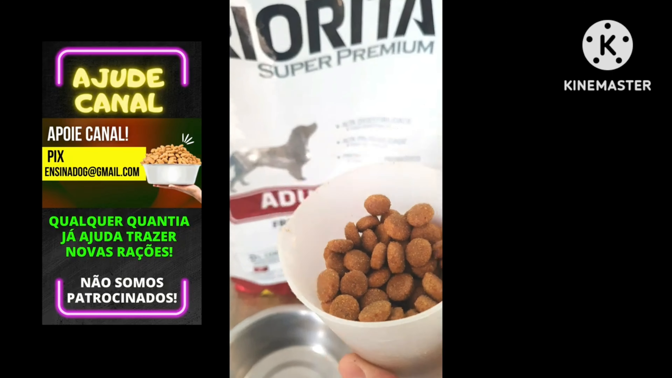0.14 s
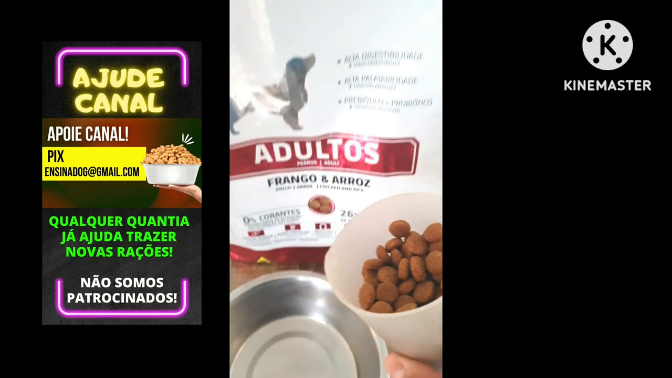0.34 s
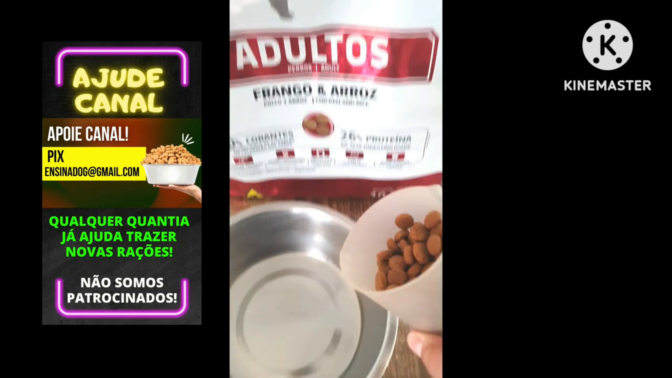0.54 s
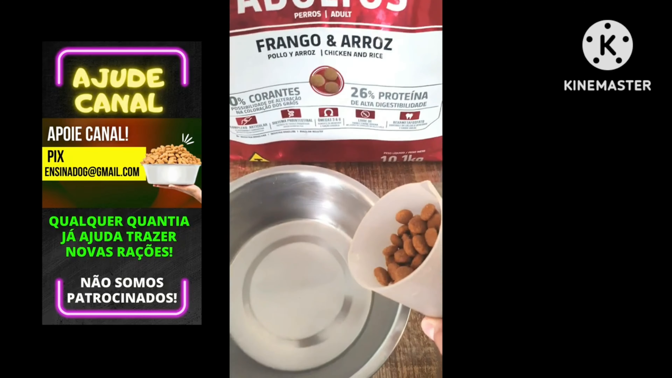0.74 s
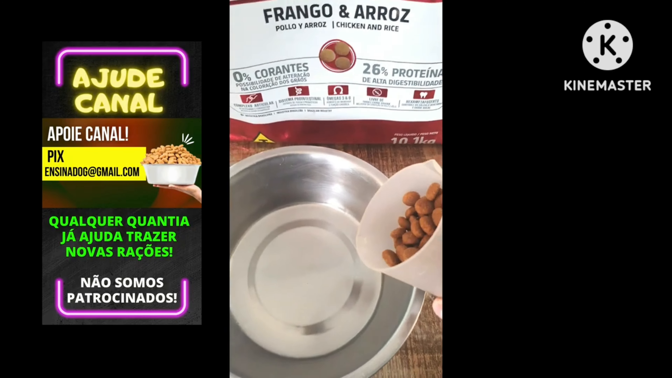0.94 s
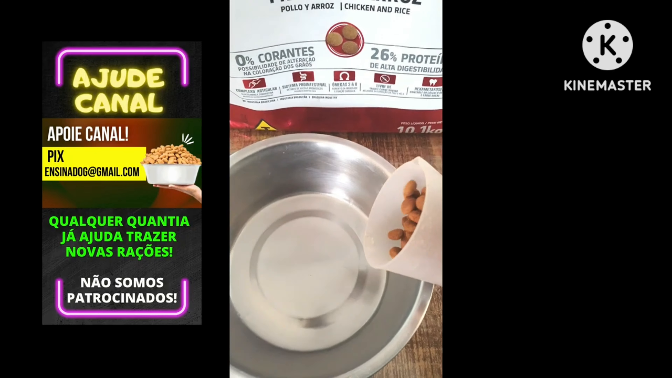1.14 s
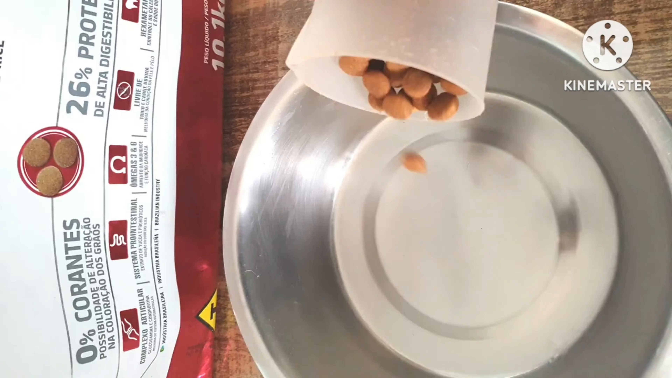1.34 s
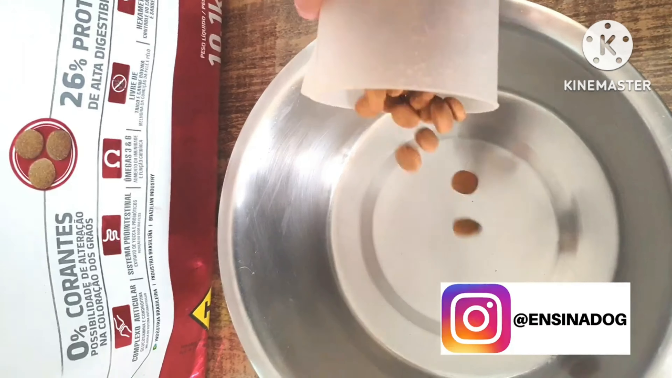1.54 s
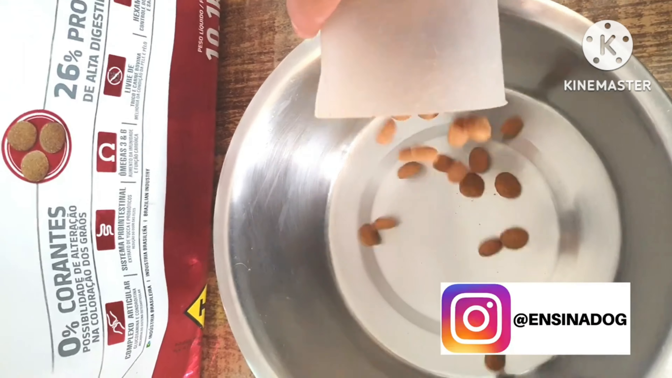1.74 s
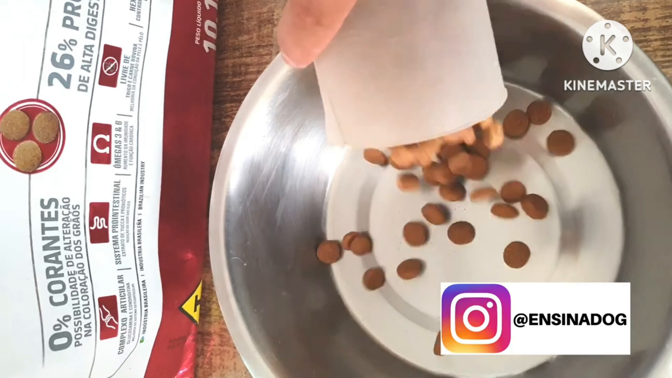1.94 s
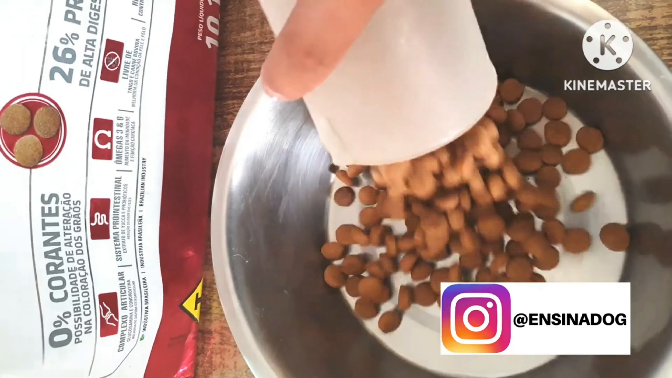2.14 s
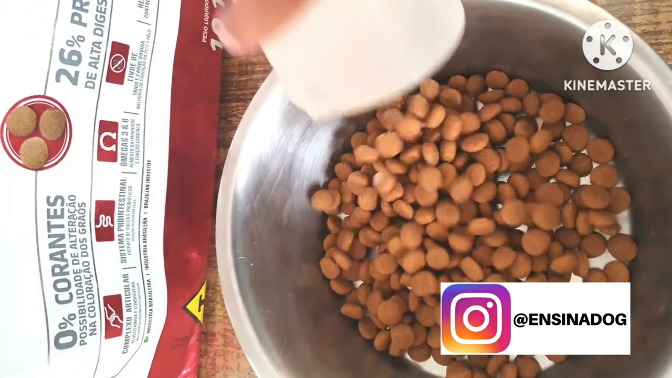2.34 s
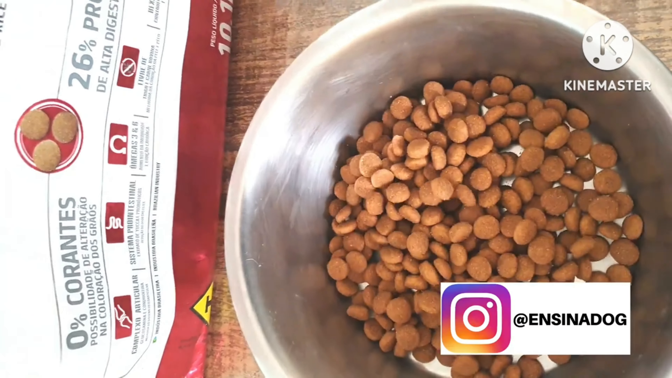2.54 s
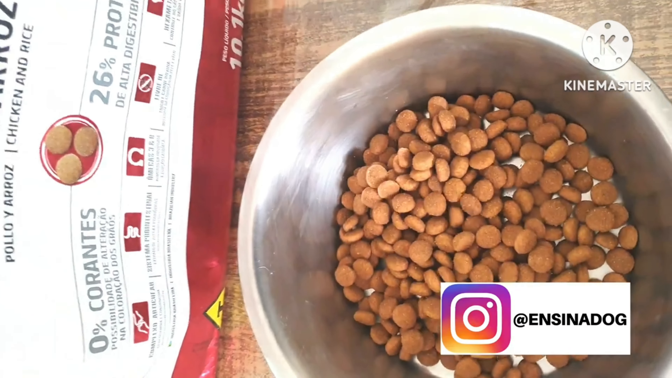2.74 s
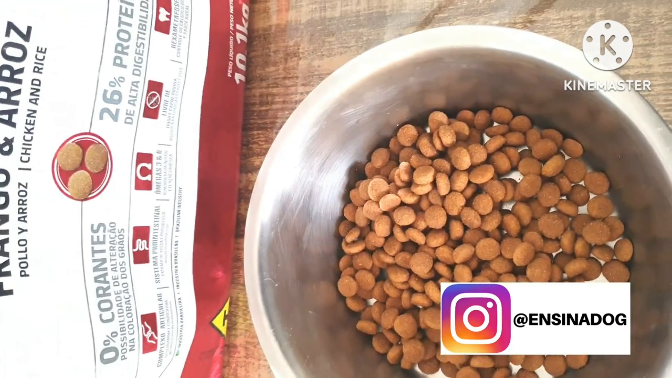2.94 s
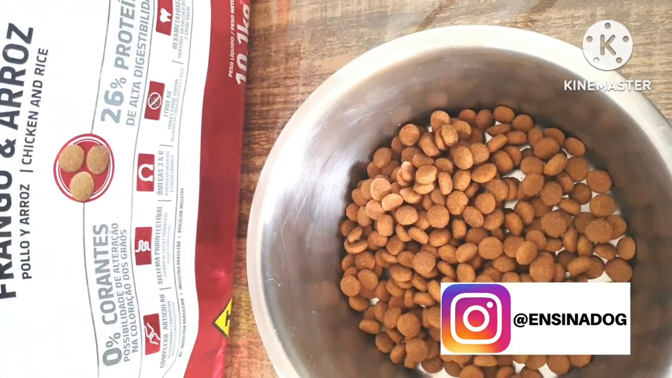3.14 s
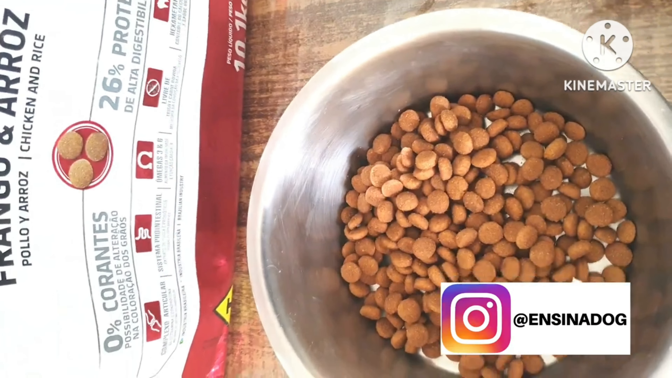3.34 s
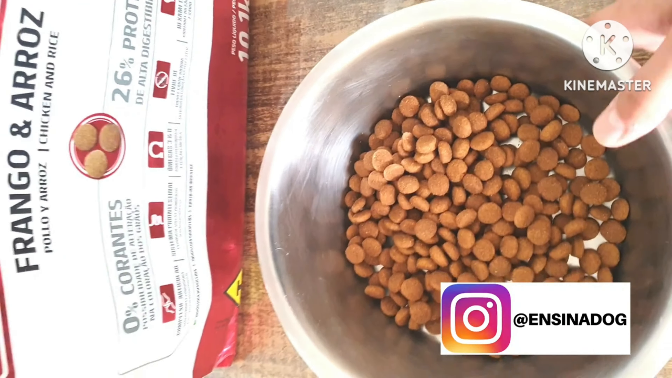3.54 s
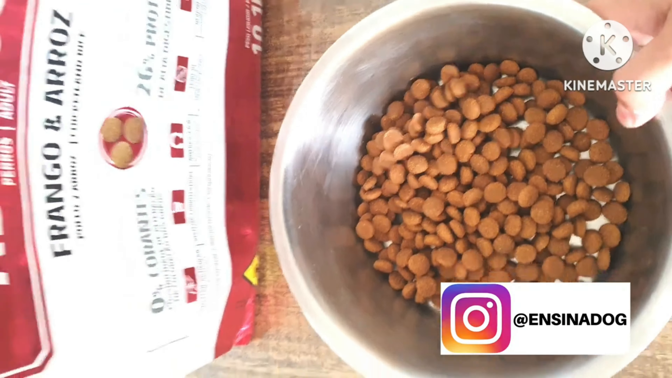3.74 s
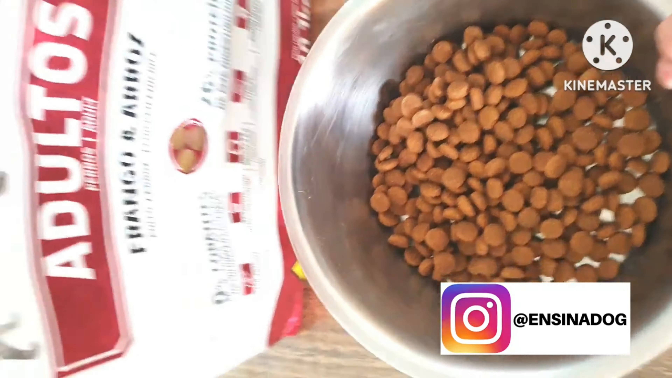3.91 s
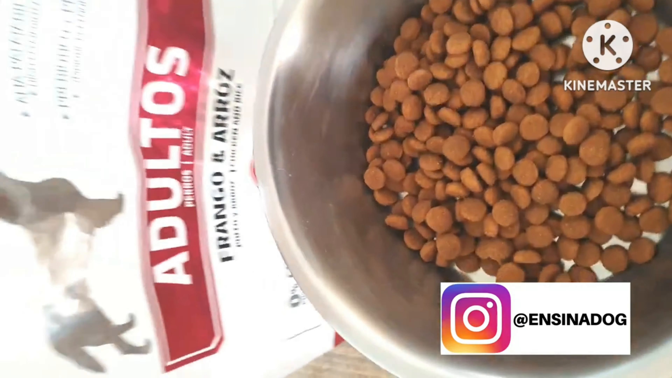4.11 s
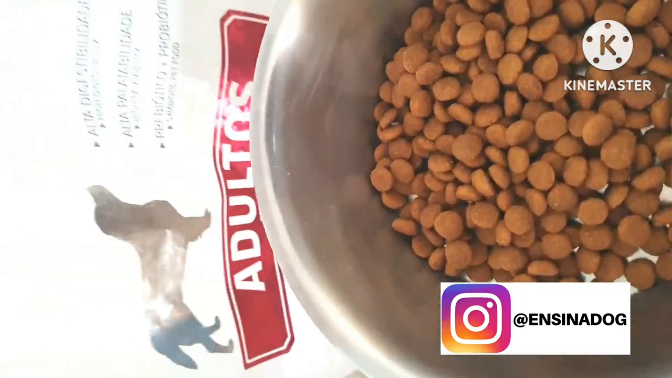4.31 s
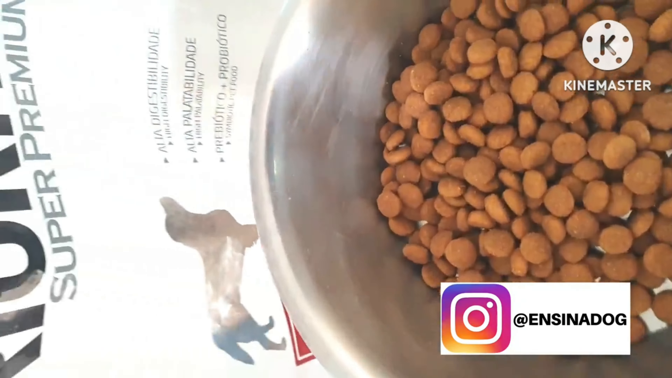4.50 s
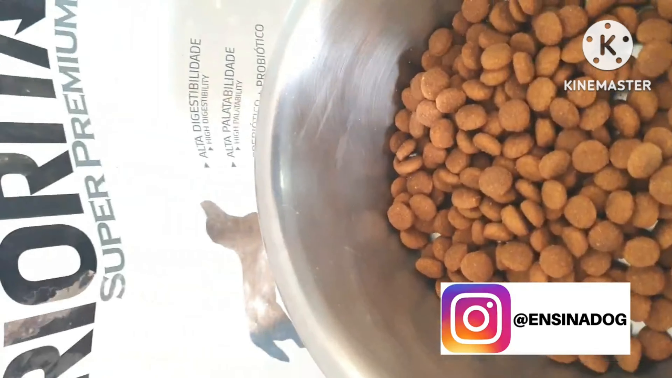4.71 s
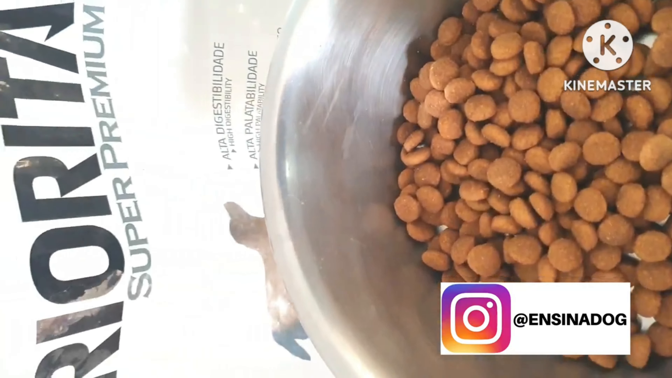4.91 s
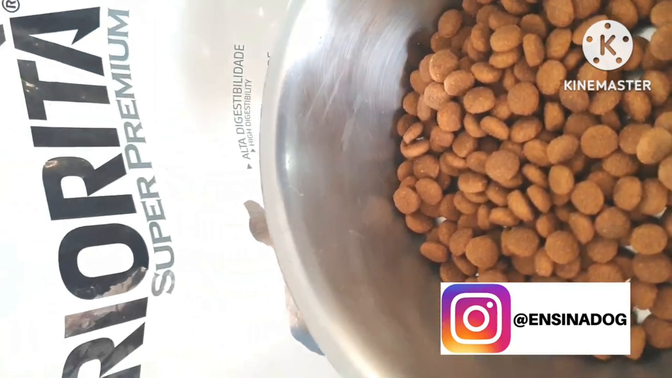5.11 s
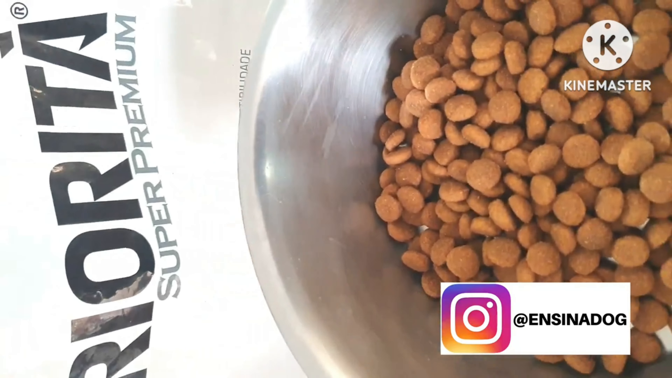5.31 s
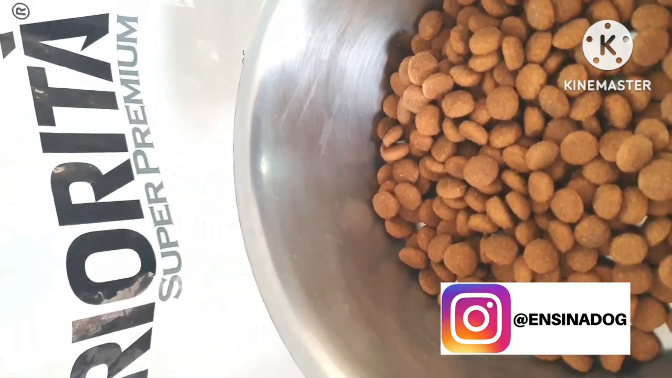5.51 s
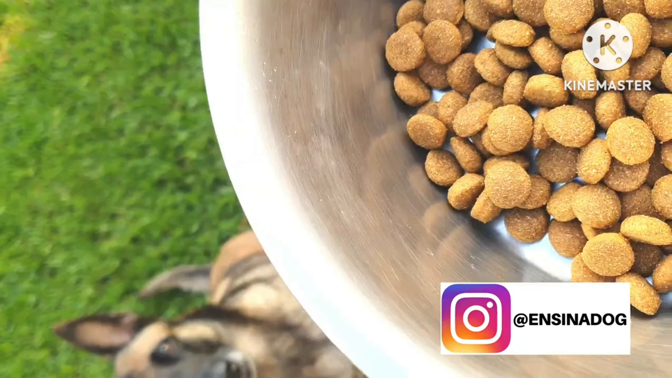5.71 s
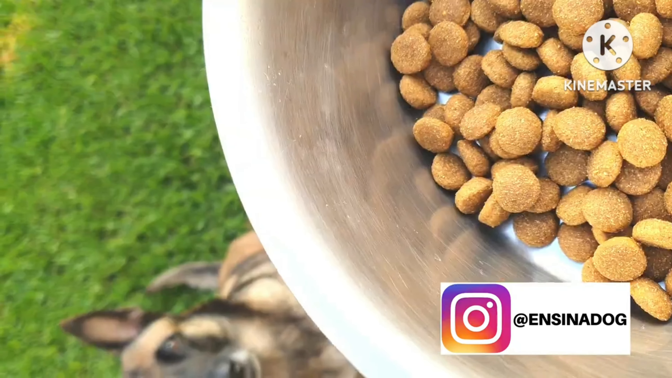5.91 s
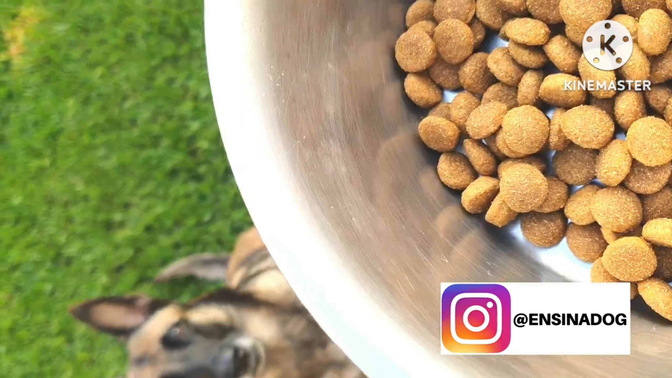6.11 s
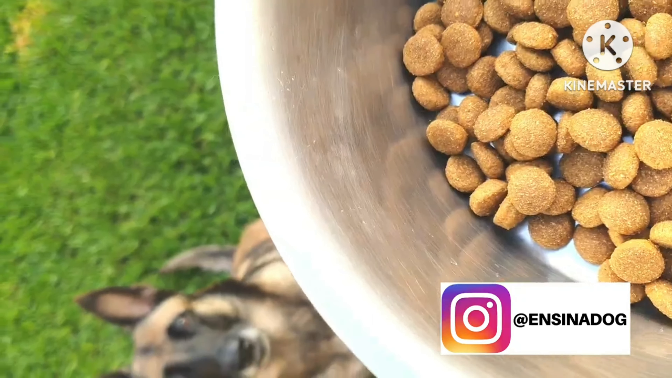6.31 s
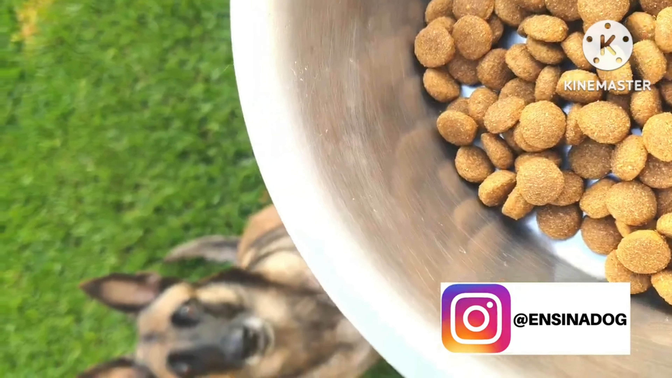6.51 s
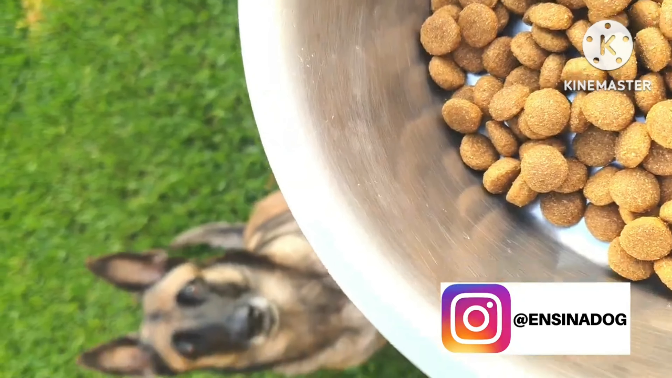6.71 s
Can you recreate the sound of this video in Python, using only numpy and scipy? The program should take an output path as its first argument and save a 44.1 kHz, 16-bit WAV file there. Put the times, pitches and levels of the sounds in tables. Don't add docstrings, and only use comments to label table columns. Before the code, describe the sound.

A low motor hum and soft room wash run from the start, with microphone hiss. Around 0.3 s there is a brief broad friction stroke and a heavy low handling thump; more bumps follow. From 0.9 to 1.5 s dry pellets tick in a plastic cup, most densely near 1.4 s. At 1.57 s the first pellets strike bare steel sharply, then the pour swells into a dense, clattering rush, loudest about 2.2 s, with hollow air pops rising in pitch and ringing that dulls as the bowl fills. It thins and stops by 2.55 s, leaving an echo. Dull table knocks come at 3.06 and 3.44 s, light scrapes near 3.7-3.9 s, then frequent muffled grip thumps on the right. Very faint distant dog whimpers occur near 4.1, 4.6, 5.6 and 6.4 s. At 6.15 s the hum cuts to a quieter outdoor wash.

```python
import sys
import numpy as np
from scipy import signal
from scipy.fft import rfft, irfft, next_fast_len
from scipy.io import wavfile
from scipy.ndimage import map_coordinates

SR = 44100
rng = np.random.default_rng(int(sys.argv[2]) if len(sys.argv) > 2 else 0)


def elevation(decibels):
    levels = np.asarray(decibels, float)
    return 10 ** (levels / 20)


def generate_wav(sig):
    pcm = np.round(np.clip(np.atleast_2d(sig).T, -1, 1) * 32767).astype(np.int16)
    wavfile.write(sys.argv[1], SR, pcm)


N = 297654

# time in seconds, peak in dB, share of the bowl's air in dB,
# share of treble in dB.
STRIKES = [(1.572, -3, -15, -16.5), (1.65, -4, -13.5, -16.5), (1.689, -12, -12.5, -25),
           (1.698, -9.5, -14, -17.5), (1.735, -25, -11.5, -18), (1.761, -24.5, -14, -22.5),
           (1.771, -19.5, -9, -21.5), (1.783, -4.5, -14, -14.5), (1.827, -7.5, -12, -18),
           (1.852, -5.5, -11.5, -18), (1.864, -7.5, -10, -20.5), (1.886, -16.5, -6, -21.5),
           (1.909, -14.5, -10.5, -20), (1.942, -18.5, -6, -22), (1.952, -14.5, -11, -23.5),
           (1.972, -6, -15, -14.5), (1.997, -12, -11.5, -19), (2.014, -9.5, -12.5, -16),
           (2.025, -6.5, -13.5, -18.5), (2.067, -7.5, -8, -19), (2.092, -7, -10.5, -14.5),
           (2.113, -7, -15, -15.5), (2.127, -7.5, -8, -14.5), (2.154, -12.5, -11, -13.5),
           (2.166, -12.5, -7, -17.5), (2.2, -12.5, -10.5, -14), (2.213, -9.5, -10, -14),
           (2.228, -16.5, -9, -15), (2.245, -14, -8, -15.5), (2.264, -14.5, -7, -16.5),
           (2.274, -15.5, -12.5, -13), (2.286, -14, -7.5, -18.5), (2.302, -17.5, -8.5, -19),
           (2.339, -14, -3, -27), (2.346, -13.5, -7, -17.5), (2.359, -13.5, -13, -17.5),
           (2.381, -18.5, -8, -16), (2.4, -18.5, -10.5, -17), (2.422, -20.5, -8, -15.5),
           (2.444, -19, -17, -24.5), (2.471, -24.5, -7.5, -27.5), (2.553, -34, -9, -25)]
# time in seconds, factor.
STRIKE_RING = [(1.8, 0.56), (2.0, 0.96), (2.4, 0.47)]
# time in seconds, level in dB, air note of the bowl in Hz.
POUR = [
    (1.76, -34, 1096),
    (1.838, -33, 1140),
    (2.034, -24, 1141),
    (2.178, -21.5, 1161),
    (2.244, -24.5, 1260),
    (2.332, -25.5, 1321),
    (2.52, -39, 1386),
]
# time in seconds, factor on ring time.
FILL = [(1.55, 0.89), (1.95, 0.65), (2.2, 0.74), (2.5, 0.089)]
# pitch in Hz, level in dB.
STEEL = [(845.2, -54), (1098, -40), (1157, -44), (1217, -42), (1303, -49), (1437, -46), (2164, -52.5),
         (2444, -42), (2939, -46.5), (3311, -45), (3413, -44), (3779, -49.5), (4377, -50), (4850, -43.5),
         (5006, -53), (5373, -58.5), (6395, -54), (7165, -57.5), (7289, -54.5), (7671, -54), (7887, -55),
         (8134, -49), (8635, -55.5), (9135, -53)]
# pitch in Hz, level in dB.
FLANK = [(5378, -46.5), (5911, -51), (6336, -51), (6837, -55.5), (7289, -50), (7677, -48.5), (8134, -42.5),
         (9141, -50.5), (9916, -57.5), (11267, -55.5)]
# pitch in Hz, time to fall 60 dB in seconds.
STEEL_T60 = [(1000, .12), (1500, .17), (2500, .14), (5000, 0.18), (9000, 0.13)]
# pitch in Hz, level in dB, time to fall 60 dB in seconds.
RIM = [(2210, -60.5, 0.28), (2660, -46, 0.045), (2580, -52.5, 0.041)]
# pitch in Hz, level in dB, time to fall 60 dB in seconds.
WALL = [(1577, 0, .5), (1841, 2, .45), (2200, 9, .7), (2640, 4, .6), (2945, 2, .44), (3548, 7, .36),
        (3910, 8, .38), (4048, 5, .35), (4705, 3, .35)]
# frequency in Hz, level in dB per Hz.
CLATTER = [(120, -36.5), (200, -14.5), (422, -25), (620, -21), (827, -5.5), (890, -14.5), (1130, -3),
           (1840, -13), (2290, -9), (2510, -3), (3120, -11), (4840, -13), (6710, -20), (8200, -14.5),
           (11500, -26), (14200, -34.5), (15500, -41.5)]
# frequency in Hz, level in dB per Hz.
HEAP = [(180, -39), (300, -9), (610, -5.5), (850, -4), (1320, 4), (1900, -4.5), (2800, -8.5), (4000, -9),
        (6500, -21), (8140, -20.5), (12700, -28), (15500, -45.5)]
# time in seconds, peak in dB, pitch in Hz, time to fall 60 dB in seconds.
RIM_PINGS = [(1.688, -11.5, 2523, 0.02), (1.698, -12.5, 2475, 0.051), (1.774, -24.5, 2587, 0.026),
             (1.827, -13.5, 2466, 0.059), (2.3585, -9.5, 2625, 0.0055), (2.424, -33, 2588, 0.019)]
# time in seconds, peak in dB, pitch in Hz.
POPS = [(1.784, -12, 1020), (1.827, -16.5, 1082), (1.852, -17.5, 1370), (1.865, -18, 1230),
        (1.866, -13.5, 1190), (1.887, -17.5, 1100), (1.909, -18.5, 1140), (1.952, -20, 1600),
        (1.952, -16.5, 1060), (1.974, -16, 1030), (1.997, -15.5, 1210), (2.013, -14.5, 1090),
        (2.067, -11, 1110), (2.093, -15, 1090), (2.129, -14.5, 1140), (2.155, -12.5, 1170),
        (2.191, -16.5, 1176), (2.214, -14.5, 1320), (2.229, -15.5, 1250), (2.246, -12.5, 1250),
        (2.266, -15.5, 1280), (2.287, -18.5, 1320), (2.301, -18.5, 1390), (2.311, -17.5, 1410),
        (2.34, -17.5, 1280), (2.414, -32.5, 1400), (2.444, -27, 895), (2.443, -19.5, 1330)]
# time in seconds, peak in dB, pitch in Hz, share of treble in dB.
RATTLES = [(0.862, -54, 1502, -22), (1.233, -51, 1320, -30.5), (1.292, -55, 1400, -20.5),
           (1.356, -45, 1418, -14.5), (1.361, -33.5, 1423, -11), (1.409, -36, 1352, -22.5),
           (1.421, -38.5, 1500, -13), (1.431, -30.5, 1411, -18.5), (1.446, -36, 705, -32.5),
           (1.456, -39.5, 705, -13.5), (1.482, -43, 1370, -21), (1.493, -47.5, 1400, -6.5),
           (1.503, -36.5, 1395, -10), (3.819, -59, 729, 1), (3.895, -52, 784, -4)]
# frequency in Hz, level in dB per Hz.
TICK = [(290, -35.5), (500, -7.5), (734, 0), (1090, -7), (2200, -4.5), (2610, -9), (3270, -7), (5310, -18),
        (9790, -22.5), (15000, -45.5)]
# time of the peak in seconds, peak in dB,
# rise in dB per second, fall in dB per second, hold in seconds.
SLIDES = [
    [(0.01, -71, 40, 55, 0), (0.305, -48.5, 260, 142.5, 0.038)],
    [(0.698, -78.5, 145, 12.5, 0)],
    [(3.66, -71, 256, 330, 0.0683), (3.815, -74.5, 400, 150, 0.0474)],
    [(3.83, -70.5, 303, 120.5, 0.056)],
    [(4.56, -78, 135, 57, 0.0014), (5.04, -81.5, 59, 50.5, 0.0117)],
    [(0.245, -60.5, 325, 93, 0.031)],
]
# frequency in Hz, level in dB per Hz.
SLIDE_TONES = [
    [(290, -4.5), (500, -7), (684, -15), (1020, -16), (1470, -20), (1630, -16.5), (3670, -17), (4050, -18),
     (5230, -15.5), (6210, -24.5), (11300, -34), (15000, -46)],
    [(1760, -35.5), (3000, -1.5), (6550, -7), (7300, -15), (8290, 8), (9300, -2.5), (15000, -16)],
    [(1180, -51), (2000, -19), (4340, -18), (5270, -17.5), (6030, -11.5), (8600, 0), (9280, -11.5),
     (15000, -24)],
    [(530, -32), (900, -5.5), (1310, 4), (2080, -8), (3610, 0.5), (6060, -20.5), (8040, -8), (15000, -17)],
    [(2350, -35), (4000, -24), (7310, -30), (8120, 10), (9530, 5), (10500, -8.5), (15000, 1)],
    [(2000, -41), (4600, -18), (5300, 4), (6000, -16), (8500, -12.5), (11500, -20), (15000, -32)],
]
# time in seconds, peak in dB.
KNOCKS = [
    (3.059, -30.5),
    (3.443, -35),
]
# pitch in Hz, level in dB, time to fall 60 dB in seconds.
KNOCK_MODES = [
    [(258.7, -19, 0.22), (528, -12.5, 0.76), (579.5, 1.5, 0.091)],
    [(775, 4, 0.015), (820, -25, 0.3), (999, -29, .3), (1250, -30, 0.23), (1600, -37, 0.37),
     (2155, -32, 0.25), (2630, -37, 0.13)],
]
# frequency in Hz, level in dB per Hz.
KNOCK_THUDS = [
    [(120, -28.5), (200, -12), (267, 0), (347, -24), (552, -1), (610, -10.5), (1070, -20), (1770, -54),
     (4000, -62), (5200, -88.5), (8800, -120)],
    [(180, -32), (300, -4.5), (707, -17), (828, -9), (920, -13), (1020, -10), (1600, -10.5), (2220, -21.5),
     (3400, -32.5), (7000, -54), (9100, -82), (15400, -120)],
]
# time of the peak in seconds, peak in dB,
# rise in dB per second, fall in dB per second, pitch in Hz.
BOOM = [
    (1.72, -57, 140, 12, 151),
    (2.4, -44.5, 24, 46.5, 125.4),
    (2.47, -50, 40, 72, 253.6),
    (3.12, -56, 203, 50, 123.7),
    (3.9, -49, 64.5, 24.5, 168.9),
]
# time in seconds, level in dB.
NUDGES = [
    (0.86, -67.5),
    (4.115, -66),
]
# time in seconds, peak in dB, pitch in Hz,
# share of the dip in dB.
JABS = [(0.352, -8, 66, -8.5), (0.406, -23, 86, -38), (0.495, -27.5, 57, -3.5), (0.965, -11, 63.2, -15.5),
        (1.073, -14.5, 63.7, -13.5), (1.329, -12.5, 67, -17.5), (1.407, -18.5, 72, -14.5),
        (2.002, -23, 76.6, -4), (3.741, -28.5, 97, -14), (4.286, -21.5, 88, -11), (5.111, -25.5, 81.1, -36)]
PRESSES = [(3.97, -21.5, 67.7, -17), (4.007, -22, 77, -14), (4.028, -30.5, 75.6, -6.5),
           (4.048, -29.5, 79.8, -8.5), (4.197, -31, 69.58, -15), (4.13, -21, 74.24, -11.5),
           (4.311, -18, 61.1, -8.5), (4.429, -18.5, 66.4, -13.5), (4.631, -21.5, 72.33, -12),
           (4.705, -21, 74.9, -11.5), (4.906, -24.5, 83.3, -8.5), (5.187, -14, 79.9, -16),
           (5.218, -22.5, 69, -12), (5.573, -11, 75.27, -15), (6.08, -23, 79.2, -26),
           (6.132, -25.5, 61.6, -19.5)]
SQUEEZES = [(0.555, -15.5, 60, -51), (0.827, -14.5, 77, -20), (1.632, -15, 69.3, -14),
            (2.125, -14.5, 78.45, -13), (2.823, -30.5, 88.9, -24), (3.608, -17.5, 78.8, -11.5),
            (3.87, -22, 73, -14), (4.231, -21.5, 78.9, -10), (5.418, -24.5, 53.43, -36),
            (6.053, -23, 85.2, -26), (6.171, -19, 82.8, -24.5)]
# delay of the peak in seconds, length in seconds.
THUMP_KINDS = [
    (.003, .016),
    (.009, 0.012),
    (0.012, .01),
]
# time of the peak in seconds, peak in dB, rise in dB per second,
# fall in dB per second, hold in seconds.
RUBS = [
    (0.951, -64.5, 81, 61.5, 0.12),
    (4.094, -58, 39.5, 40, 0.25),
    (4.558, -63, 67, 25, 0.18),
    (5.573, -56.5, 400, 205, .02),
]
# frequency in Hz, level in dB per Hz.
RUB_TONE = [(200, -20), (320, 2.5), (680, -6.5), (900, -22.5), (2000, -32.5), (4500, -37.5), (7000, -60)]
# time in seconds, level in dB.
GRIP = [(0.0, -58), (0.28, -39.5), (0.47, -36.5), (0.77, -39.5), (1.75, -47), (2.61, -63.5), (2.91, -57.5),
        (3.8, -40.5), (4.74, -46.5), (5.66, -45.5), (5.9, -48.5), (6.03, -39.5), (6.75, -42)]
# frequency in Hz, level in dB per Hz.
GRIP_TONE = [(12, -42.5), (20, -6), (55, 6.5), (77, 0), (110, -5.5), (135, -16.5), (161, -17.5), (433, -46),
             (709, -54), (900, -63.5), (1170, -94), (1980, -120)]
# start in seconds, length in seconds, pitch in Hz, peak in dB,
# share of the length before the peak.
WHIMPERS = [
    (4.048, 0.25, 594, -67.5, 0.84),
    (4.601, 0.414, 575, -68.5, 0.17),
    (5.551, 0.5, 627.3, -74, 0.057),
    (6.391, 0.4, 560, -69, 0.71),
]
# overtones in dB, width in Hz, depth of the pitch arch, place of its top.
WHIMPER_VOICES = [
    (-34, 31.3, .05, 0.45),
    (-45, 35, .05, .4),
    (-40, 44, 0.62, 0.483),
    (-10, 58, 0.32, 0.791),
]
# pitch in Hz, level in dB.
HUM = [(37.5, -68), (75, -64), (100, -69), (150, -57), (187, -65.5), (225, -62), (262, -74.5), (300, -63.5),
       (375, -69), (413, -77), (450, -78)]
# frequency in Hz, level in dB per Hz.
INDOORS = [(25, -3.5), (45, 3), (110, -7.5), (250, -16), (520, -23), (620, -27), (900, -36.5),
           (2000, -48.5)]
# frequency in Hz, time to fall 60 dB in seconds.
ROOM = [(150, 0.67), (500, 0.9), (1200, 0.66), (3800, 0.67), (6000, 0.54), (12000, .52)]
# frequency in Hz, loss in dB.
COVER = [(60, -2.5), (110, -2), (200, 4.5), (380, 5.5), (700, 12), (1290, 16.5), (2380, 13.5), (3600, 13),
         (4400, 29), (8120, 71), (15000, 43)]
# frequency in Hz, level in dB per Hz.
HISS = [(380, -31), (650, -8.5), (1050, -7.5), (1150, -6.5), (1320, -4.5), (2370, -7.5), (6120, -17),
        (7000, -22), (7680, -25), (8550, -18.5), (14400, -20), (15800, -26)]
# time in seconds, hiss level in dB.
HISS_DB = [(2.82, -78.5), (2.89, -86), (3.44, -90), (3.57, -86)]

PELLETS_PER_S = 380
RIM_PER_DB = -2.5
ONE_PORT_DB = 5
ENTRY_DB, EXIT_DB = -11.5, -17
DRONE_HZ, DRONE_DB, DRONE_SAG_HZ_PER_S, DRONE_RISE_S = 69, -47, 0.7, 0.33
INDOORS_DB, CUT_S = -55, 6.15
EDGE_HZ = 15300


def evened(x):
    return x / np.sqrt(np.mean(x ** 2) + 1e-20)


def read(points, hz):
    f, value = np.transpose(points)
    return np.interp(np.log(hz + 1), np.log(f + 1), value)


def curve(rows, column=1):
    return np.interp(np.arange(N) / SR, np.transpose(rows)[0], np.transpose(rows)[column])


def add(mix, s, sound):
    part = mix[round(s * SR):][:len(sound)]
    part += sound[:len(part)]


def colour(x, points, sign=1):
    size = next_fast_len(x.shape[-1])
    gain = elevation(sign * read(points, np.fft.rfftfreq(size, 1 / SR)))
    return irfft(rfft(x, size) * gain, size)[..., :x.shape[-1]]


def share_db(x, lo_hz, hi_hz):
    power, hz = abs(rfft(x[:1024])) ** 2, np.fft.rfftfreq(1024, 1 / SR)
    band = (hz > lo_hz) & (hz < hi_hz)
    return 10 * np.log10(power[band].sum() / power.sum())


def slow(per_s):
    knots = rng.standard_normal(700)
    return evened(map_coordinates(knots, [np.arange(N) / SR * per_s], order=3))


def swell(s, db, rise_db, fall_db, hold_s=0):
    t = np.arange(N) / SR - s
    return elevation(db + np.where(t < 0, rise_db * t, -fall_db * np.maximum(t - hold_s, 0)))


def resonate(x, hz, width):
    turn = np.exp(2j * np.pi * np.cumsum(hz * np.ones(len(x))) / SR)
    r = np.exp(-np.pi * width / SR)
    return 2 * (turn * signal.lfilter([1 - r], [1, -r], x / turn + 1e-18)).real


def resonate_twice(x, hz, width):
    return resonate(resonate(x, hz, width), hz, width)


def ring(modes, size, spread_db=0):
    hz, db, t60 = np.transpose(modes)[:, :, None]
    t = np.arange(size) / SR
    chance = rng.standard_normal((2, len(hz), 1))
    gain = elevation(db + spread_db * chance[0] - 60 * t / t60) * np.sign(chance[1])
    return (gain * np.sin(2 * np.pi * hz * t)).sum(0)


def impact(s, ring_factor=1):
    t = np.arange(8192) / SR
    bare = np.clip(np.interp(s, *np.transpose(FILL)), .05, 1)
    fill = ring_factor * bare
    body = STEEL + [(hz, db - 0.5) for hz, db in FLANK]
    steel = [(hz * rng.uniform(1.0, 1.01), db, read(STEEL_T60, hz) * fill) for hz, db in body]
    rim = [(hz, db, t60 * bare) for hz, db, t60 in RIM]
    modes = ring(steel + rim, size=8192, spread_db=4.5)
    noise = rng.standard_normal(8192)
    air_hz = np.interp(s, *np.transpose(POUR)[[0, 2]]) * rng.uniform(0.904, 1.14)
    modes += .6 * bare * abs(modes).max() * ring([(air_hz, 0, 0.02 * ring_factor)], size=8192)
    clatter = bare * evened(colour(noise, CLATTER))
    patter = 0.88 * (1 - bare) ** 2 * evened(colour(noise, HEAP))
    fine = evened(clatter + patter)
    fine *= elevation(-60 * t / (0.058 * fill + .012)) + elevation(-18 - 60 * t / (.24 * fill))
    spread = (1 - np.exp(-t / 0.0021)) * np.cos(t / t[-1] * np.pi / 2)
    modes_gain = elevation(-9.5 - 23.0 * (0.5 - bare))
    return (modes_gain * modes / abs(modes).max() + elevation(-4.0) * fine) * spread


def strikes():
    out = np.zeros(N)
    for s, db, air_db, treble_db in STRIKES:
        hit = impact(s, np.interp(s, *np.transpose(STRIKE_RING)))
        rim_db = RIM_PER_DB * max(-14.5 - air_db, 0)
        air_gain_db = air_db + 7 - share_db(hit, 800, 1600)
        treble_gain_db = treble_db + 8 - share_db(hit, 5000, 12000)
        tone = [(1500, air_gain_db), (2200, 0.0025), (2650, rim_db), (3300, 0.0037), (5500, treble_gain_db)]
        hit = colour(hit, tone) * np.linspace(1, 0, 8192)
        add(out, s, elevation(db + ONE_PORT_DB - 1.5) * hit / abs(hit).max())
    return out


def stream(count=10):
    sizes = elevation(4.8 * np.minimum(rng.exponential(1, N), 3.2)) * (rng.random(N) < PELLETS_PER_S / SR)
    t, out = np.arange(N) / SR, np.zeros(N)
    times = np.linspace(POUR[0][0], POUR[-1][0], count)
    place = np.round(np.interp(t, times, np.arange(count)) + rng.uniform(-1.5, 1.5, N))
    flow = elevation(curve(POUR)) * (t > times[0]) * (t < times[-1]) / np.sqrt(PELLETS_PER_S)
    for k, s in enumerate(times):
        hit = impact(s)
        out += signal.oaconvolve(sizes * flow * (place == k), hit / np.linalg.norm(hit))[:N]
    hollow = np.clip(np.interp(t, *np.transpose(FILL)), 0, 1) ** 0.76
    wall = np.zeros(N)
    for hz, db, t60 in WALL:
        wall += elevation(db) * signal.lfilter(*signal.iirpeak(hz, hz * t60 / 1.6, fs=SR), out)
    out += elevation(-6.5) * hollow * resonate(out, curve(POUR, 2), 340) + wall
    return elevation(41) * out


def pings():
    out = np.zeros(N)
    onset = np.minimum(np.arange(4096) / (0.00035 * SR), 1)
    for s, db, hz, t60 in RIM_PINGS:
        ping = ring([(hz, 0, t60), (hz * 1.07, -3, t60), (hz * 0.92, -5, t60)], size=4096) * onset
        add(out, s, elevation(db + ONE_PORT_DB) * ping / abs(ping).max())
    return out


def pops():
    out = np.zeros(N)
    onset = np.minimum(np.arange(4096) / (0.00086 * SR), 1)
    for s, db, hz in POPS:
        pop = ring([(hz, 0, .03), (hz * 1.3, -6, .025)], size=4096) * onset
        add(out, s, elevation(db + ONE_PORT_DB - 3) * pop / abs(pop).max())
    return out


def rattles():
    out, t = np.zeros(N), np.arange(4096) / SR
    for s, db, hz, treble_db in RATTLES:
        crack = colour(rng.standard_normal(4096), TICK)
        crack = colour(crack, [(1500, 0.00036), (5000, treble_db + 17.5)])
        fade = elevation(-60 * t / 0.0073) + elevation(-13.5 - 60 * t / 0.14)
        tick = evened(crack) * fade + elevation(-2.5) * ring([(hz, 0, .02)], size=4096)
        tick *= 1 - np.exp(-t / .0004)
        add(out, s, elevation(db + ONE_PORT_DB) * tick / abs(tick).max())
    return out


def slides():
    out = np.zeros(N)
    for strokes, tone in zip(SLIDES, SLIDE_TONES):
        grains = evened(colour(rng.standard_normal(N) * elevation(1.3 * slow(80)), tone))
        out += elevation(ONE_PORT_DB) * sum(swell(*row) for row in strokes) * grains
    return out


def knocks():
    out, t = np.zeros(N), np.arange(16384) / SR
    tails_s, rises_s, thuds_db = [.4, .3], [.0012, .0003], [-2, -16]
    kinds = zip(KNOCKS, KNOCK_MODES, KNOCK_THUDS, tails_s, rises_s, thuds_db)
    for (s, db), modes, tone, t60, rise, thud_db in kinds:
        fade = elevation(-60 * t / 0.0125) + elevation(-3.5 - 60 * t / t60)
        thud = evened(colour(rng.standard_normal(16384), tone)) * fade
        blow = ring(modes, size=16384) + elevation(thud_db) * thud
        blow *= 1 - np.exp(-(t / rise) ** 2)
        add(out, s, elevation(db + ONE_PORT_DB) * blow / abs(blow).max())
    shake = rng.standard_normal(N)
    return out + sum(swell(*row) * evened(resonate_twice(shake, hz, 70)) for *row, hz in BOOM)


def grip():
    out, lead = np.zeros(N), 0.04
    t = np.arange(6000) / SR - lead
    shifts = [row + kind for rows, kind in zip([JABS, PRESSES, SQUEEZES], THUMP_KINDS) for row in rows]
    for s, db, hz, snap_db, delay, length in shifts:
        push = np.exp(-((t - delay) / np.where(t < delay, delay + 0.0038, length)) ** 2)
        low = push * np.cos(2 * np.pi * hz * (t - delay))
        snap = -np.exp(-((t + .0003) / .001) ** 2)
        rub = rng.standard_normal(6000)
        scratch = evened(colour(rub, [(700, -20), (1200, 0), (4500, -7.5), (7000, -29.5)]))
        creak = evened(resonate_twice(rub, 450, 330)) + elevation(-26.5) * scratch
        creak *= elevation(db - 27) * np.exp(-((t - .004) / np.where(t < .004, .006, .02)) ** 2)
        add(out, s - lead, elevation(db) * (low + elevation(snap_db + 11) * snap + creak))
    add(out, 6.132, elevation(-31) * np.exp(-(t + lead) / 0.0034))
    rumble = evened(colour(rng.standard_normal(N), GRIP_TONE) * elevation(1.0 * slow(14)))
    creeping = evened(colour(rng.standard_normal(N) * elevation(3 * slow(60)), RUB_TONE))
    out += sum(swell(*row) for row in RUBS) * creeping
    return out + elevation(curve(GRIP) + ONE_PORT_DB) * rumble


def nudges():
    out, t = np.zeros(N), np.arange(12000) / SR
    for (s, db), (lower_hz, upper_hz) in zip(NUDGES, [(1500, 3800), (1620, 2360)]):
        air = rng.standard_normal(12000)
        blur = evened(resonate_twice(air, lower_hz, 500))
        blur += 0.61 * evened(resonate_twice(air, upper_hz, 350))
        add(out, s, elevation(db - 60 * t / 0.36) * (1 - np.exp(-t / 0.0042)) * blur)
    return out


def whimpers():
    out = np.zeros(N)
    for (s, length, top_hz, peak_db, share), (over_db, width, arch, top) in zip(WHIMPERS, WHIMPER_VOICES):
        t = np.arange(0, length, 1 / SR)
        hz = top_hz * (1 - arch * (t / length - top) ** 2)
        level_db = peak_db + np.interp(t / length, [0, share, 1], [ENTRY_DB, 0, EXIT_DB])
        air = rng.standard_normal(N)[:len(hz)]
        voice = evened(resonate_twice(air, hz, width))
        for ratio, db in [(.66, 0.5), (1.85, 1), (3.02, -7)]:
            voice += elevation(over_db + db) * evened(resonate_twice(air, ratio * hz, 130))
        add(out, s, elevation(level_db + 7.5) * voice * signal.windows.tukey(len(hz), .15))
    return out


def motor():
    t = np.arange(N) / SR
    lines = np.zeros(N)
    for hz, db in HUM:
        lines += elevation(db - 3.5 + 3.3 * slow(2.027)) * np.sin(2 * np.pi * (hz * t + rng.random()))
    drone = elevation(DRONE_DB - 4.8 * np.clip(t - 5.2, 0, 1) + 4.4 * slow(6.8))
    drone *= np.minimum(t / DRONE_RISE_S, 1) ** 2
    drone *= np.sin(2 * np.pi * (DRONE_HZ - DRONE_SAG_HZ_PER_S * t / 2) * t)
    wash = elevation(INDOORS_DB + 1.4 * slow(2.6)) * evened(colour(rng.standard_normal(N), INDOORS))
    motor_on, wash_on = np.clip((CUT_S - t) / 0.017, 0, 1), np.clip((CUT_S - t) / 0.021, .3, 1)
    return (lines + drone) * motor_on + wash * wash_on


def room(x, count=2):
    taps = np.zeros((count, SR))
    at = np.arange(200, SR - 20, 20) + rng.integers(0, 20, (count, (SR - 201) // 20))
    np.put_along_axis(taps, at, rng.choice([-1., 1.], at.shape), 1)
    hz, t, z = signal.stft(taps, SR, nperseg=256)
    tail = signal.istft(z * elevation(-60 * t / read(ROOM, hz)[:, None]), SR, nperseg=256)[1]
    return signal.fftconvolve(x[None], tail / np.linalg.norm(tail[0]), axes=1)[:, :N]


def scene():
    near = strikes() + stream() + rattles() + slides() + pings() + pops()
    far = knocks() + nudges() + whimpers()
    hum = motor()
    wet = room(elevation(-5.5) * near + elevation(-2.5) * far)
    left = near + far + wet[0] + hum
    under_finger = elevation(-8.0) * (near + far + wet[0]) + wet[1] + elevation(-10.0) * hum
    right = colour(under_finger, COVER, sign=-1.5) + grip()
    return np.array([left + elevation(-48.5) * right, right])


def band_limit(x):
    return signal.sosfilt(signal.butter(12, 16470, fs=SR, output="sos"), x)


def record(dry):
    level_db = curve(HISS_DB) + [[5], [1.5]]
    hiss = elevation(level_db) * evened(colour(rng.standard_normal(dry.shape), HISS))
    edge = signal.firwin(255, EDGE_HZ, window=("kaiser", 9), fs=SR)[None]
    fade_out = np.minimum((N - np.arange(N)) / 150, 1)
    loud = 1.278 * np.tanh((dry + hiss) / 1.28)
    return band_limit(signal.oaconvolve(fade_out * loud, edge, "same"))


dry = scene()
out = record(dry)
generate_wav(out)
```